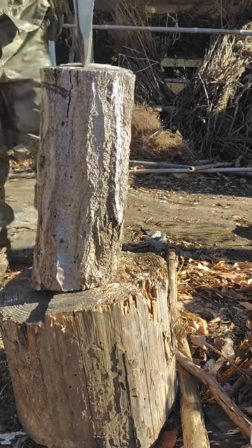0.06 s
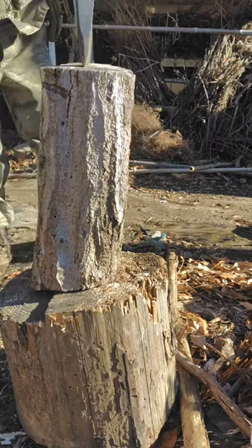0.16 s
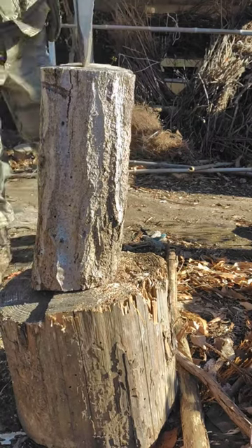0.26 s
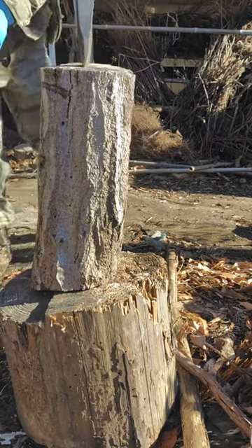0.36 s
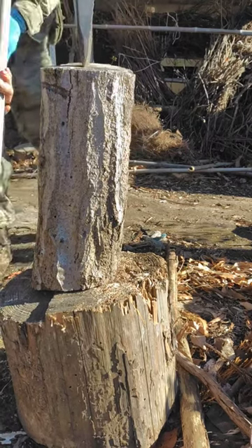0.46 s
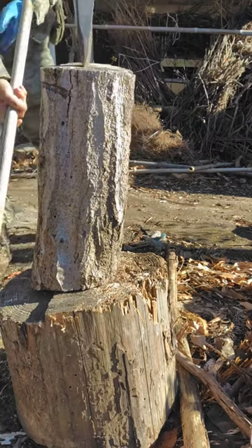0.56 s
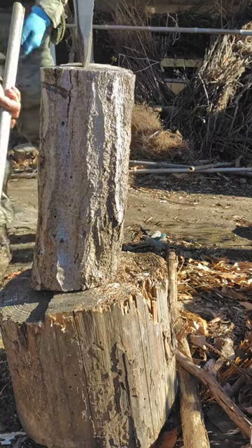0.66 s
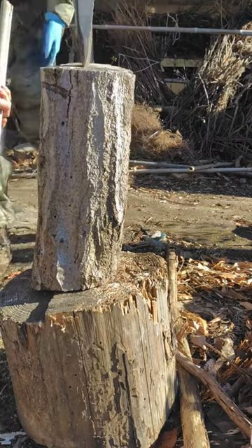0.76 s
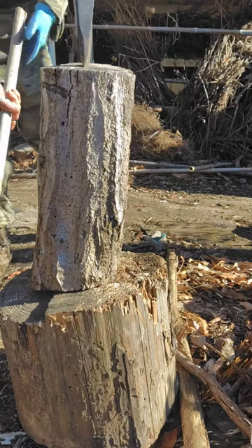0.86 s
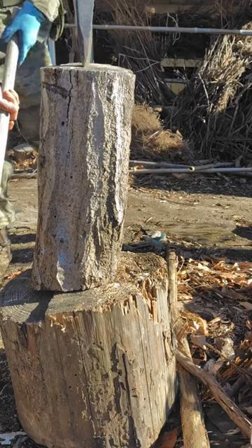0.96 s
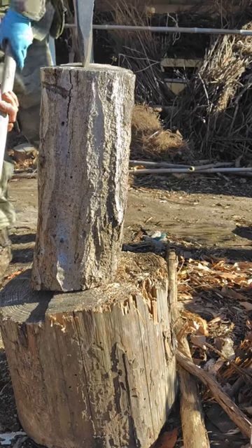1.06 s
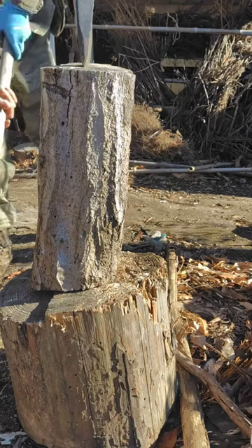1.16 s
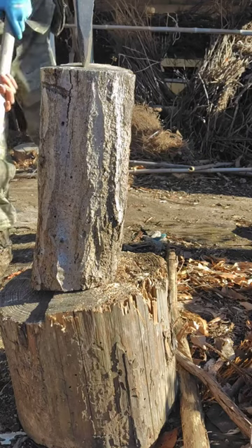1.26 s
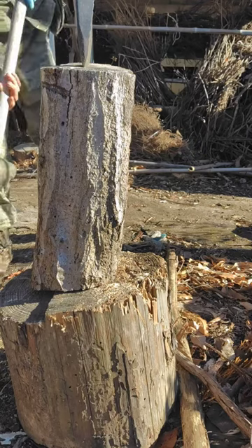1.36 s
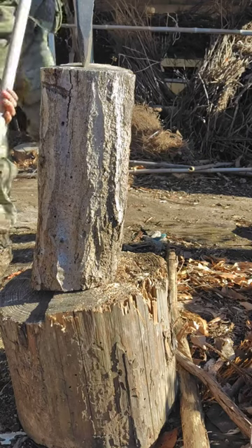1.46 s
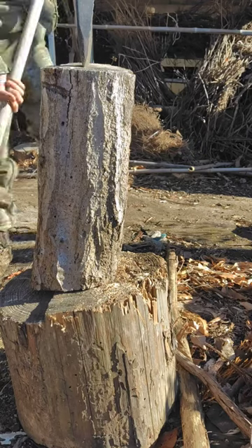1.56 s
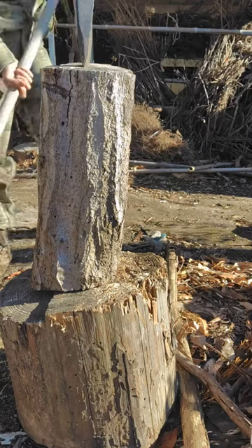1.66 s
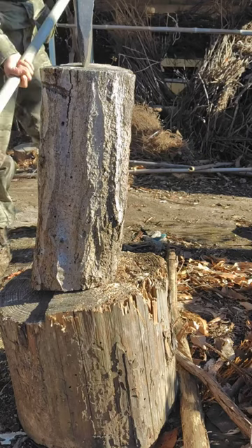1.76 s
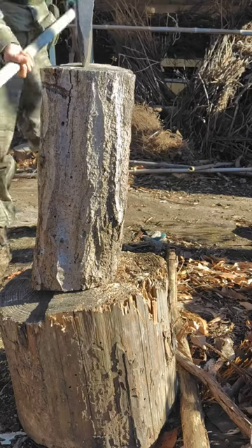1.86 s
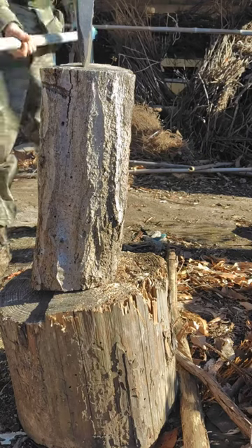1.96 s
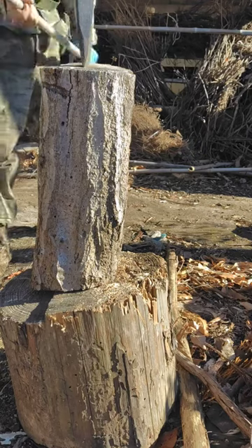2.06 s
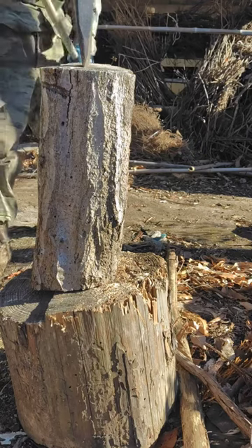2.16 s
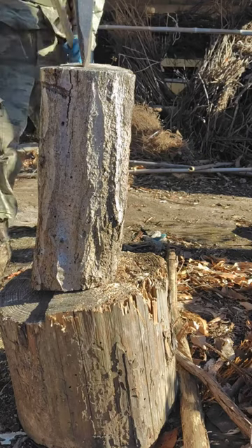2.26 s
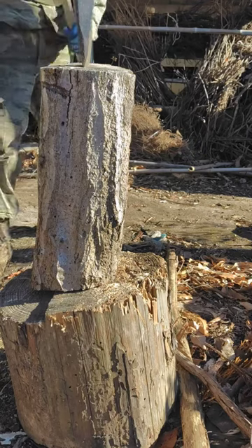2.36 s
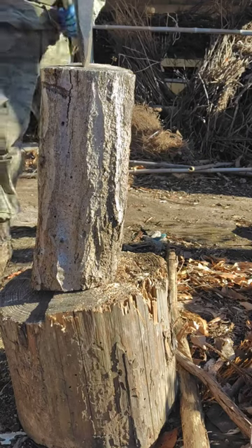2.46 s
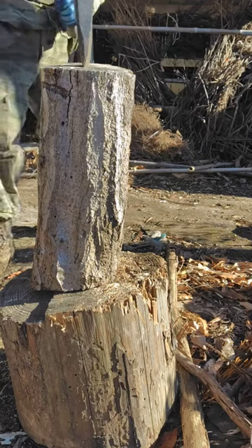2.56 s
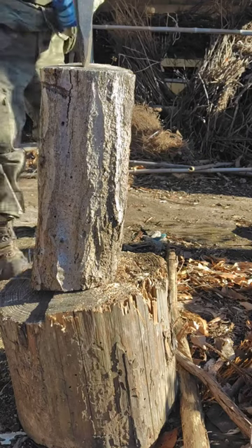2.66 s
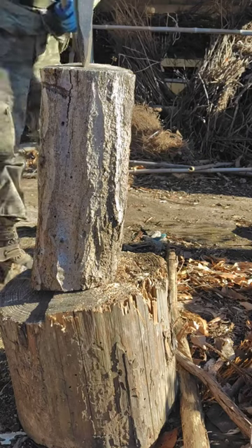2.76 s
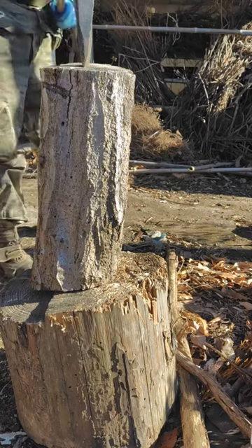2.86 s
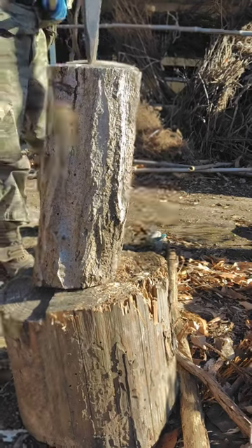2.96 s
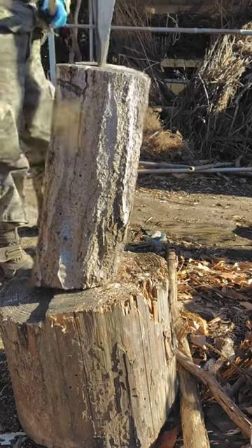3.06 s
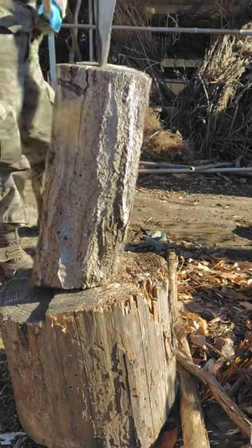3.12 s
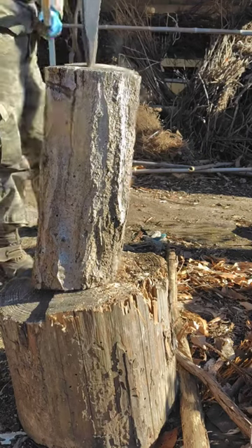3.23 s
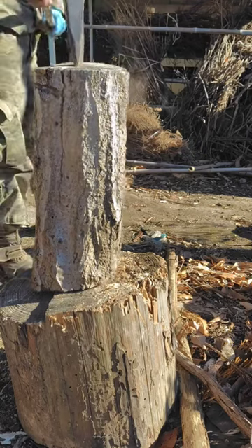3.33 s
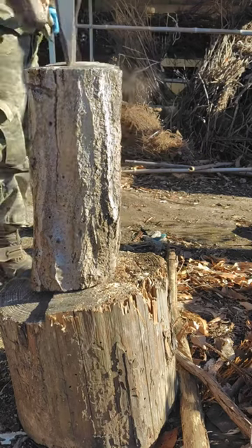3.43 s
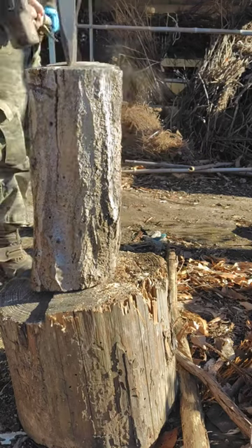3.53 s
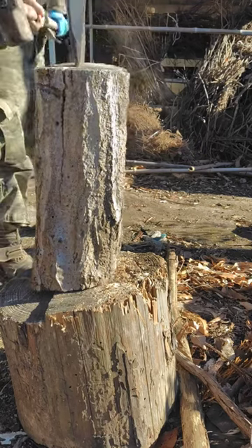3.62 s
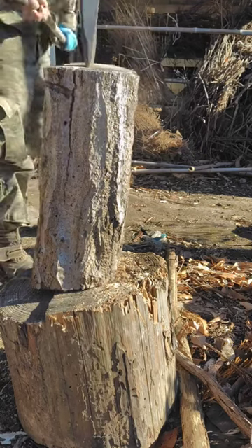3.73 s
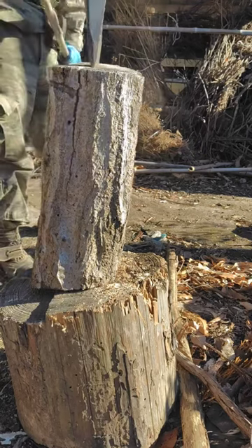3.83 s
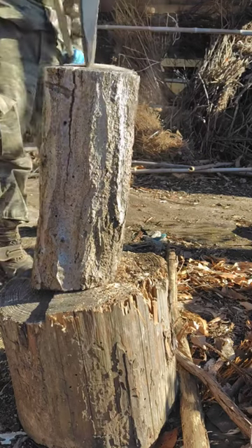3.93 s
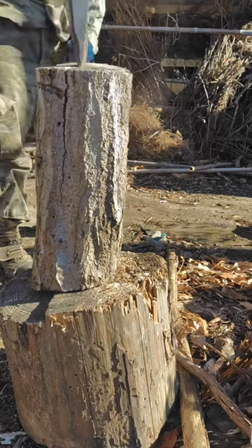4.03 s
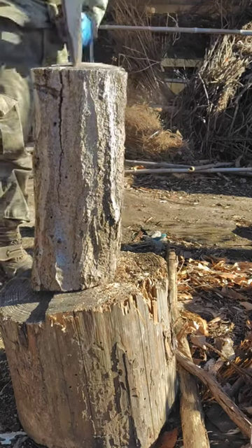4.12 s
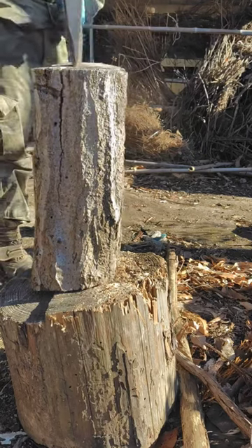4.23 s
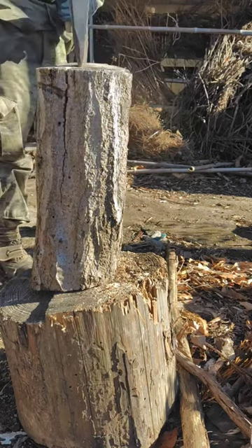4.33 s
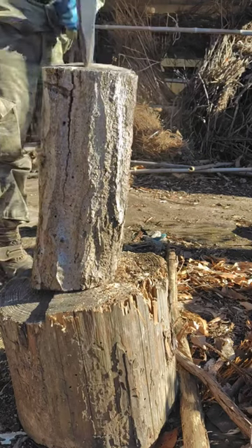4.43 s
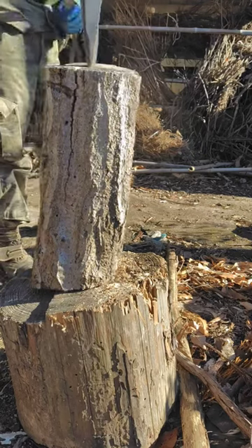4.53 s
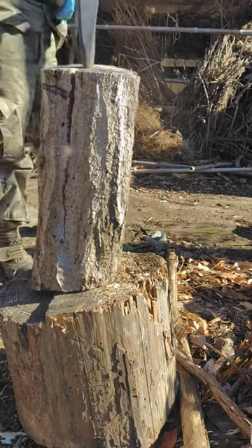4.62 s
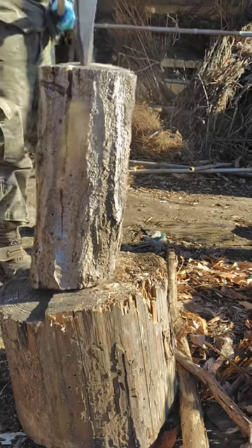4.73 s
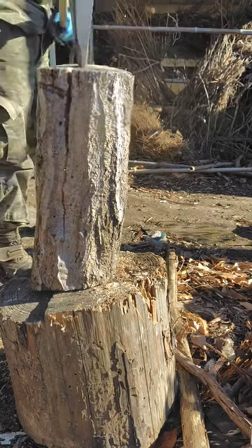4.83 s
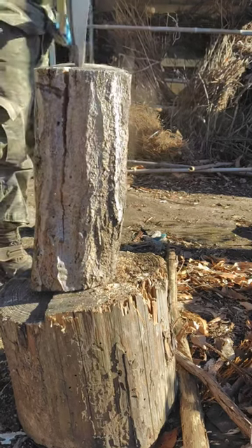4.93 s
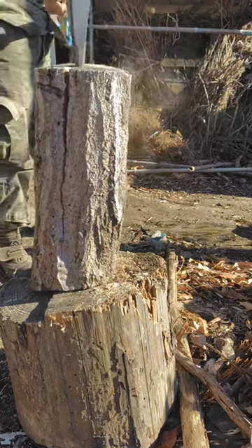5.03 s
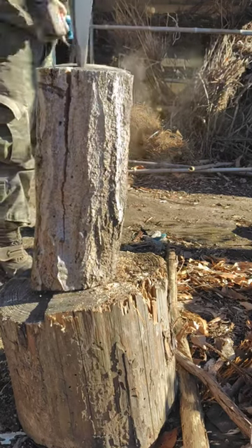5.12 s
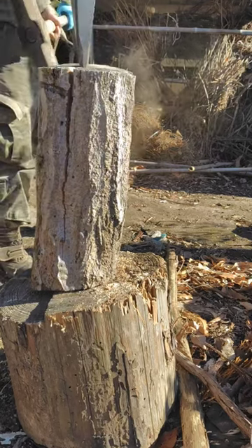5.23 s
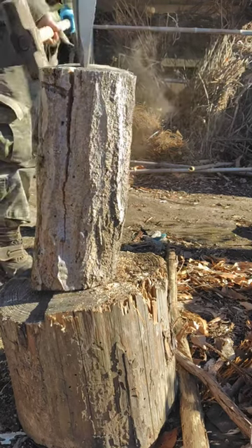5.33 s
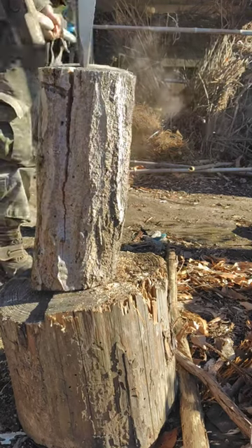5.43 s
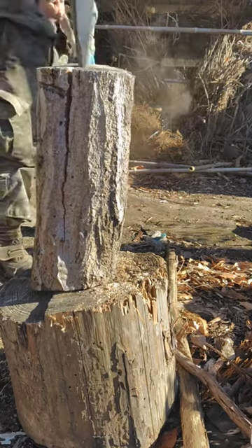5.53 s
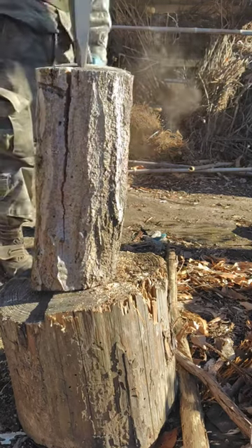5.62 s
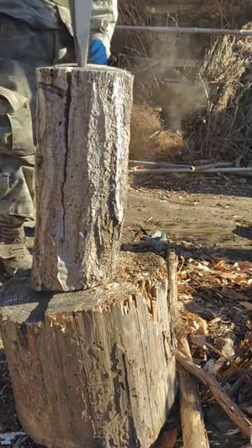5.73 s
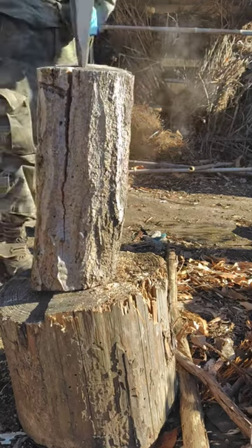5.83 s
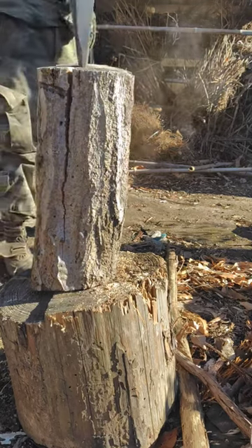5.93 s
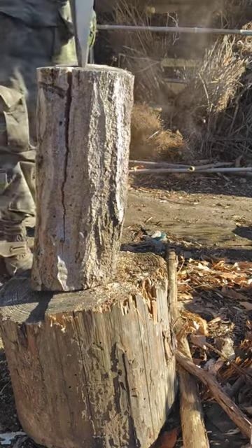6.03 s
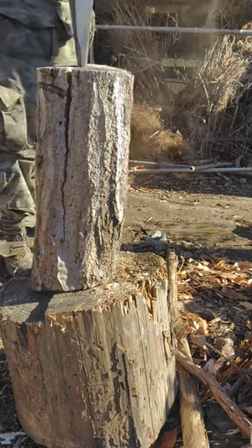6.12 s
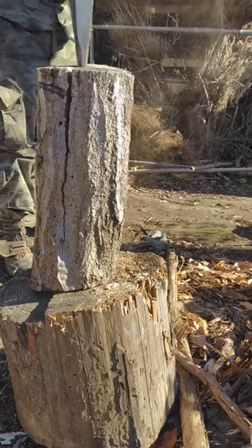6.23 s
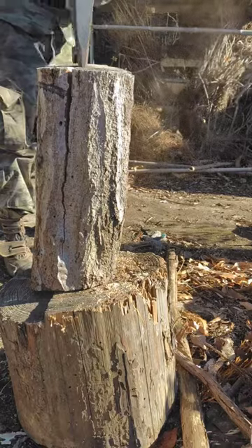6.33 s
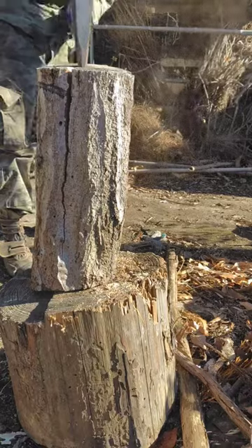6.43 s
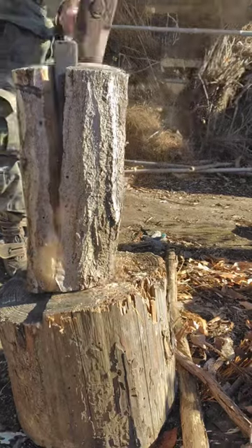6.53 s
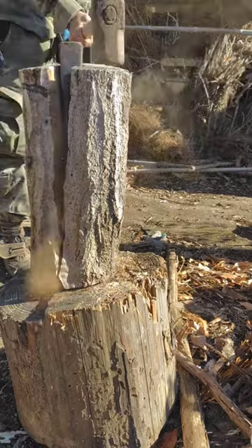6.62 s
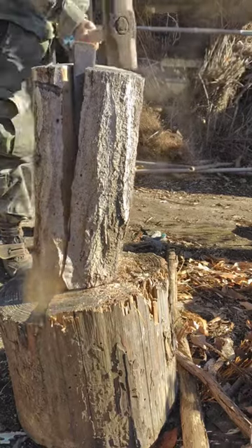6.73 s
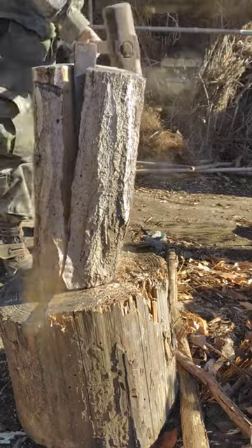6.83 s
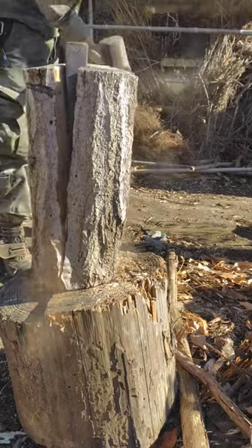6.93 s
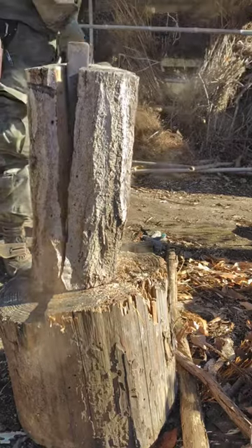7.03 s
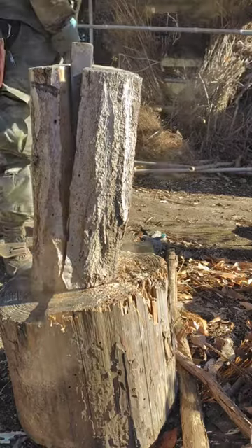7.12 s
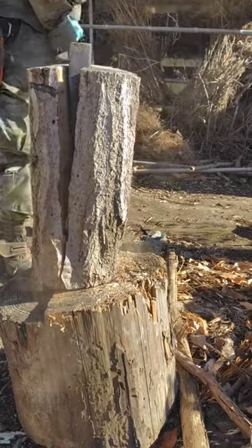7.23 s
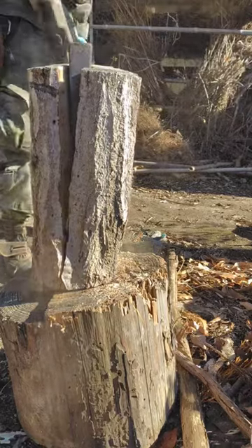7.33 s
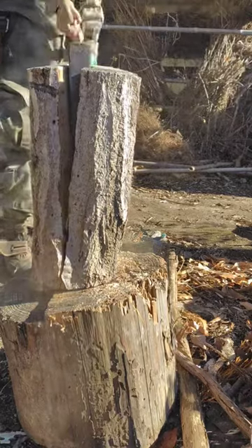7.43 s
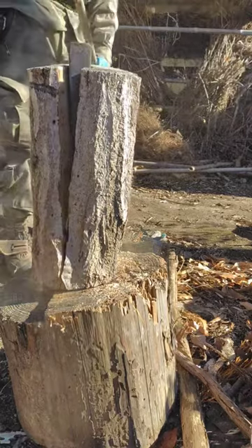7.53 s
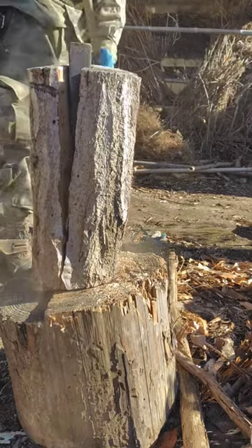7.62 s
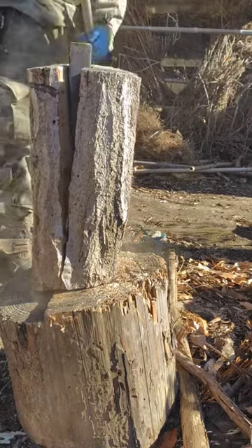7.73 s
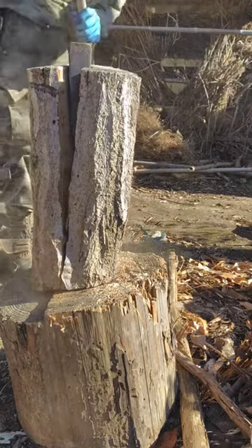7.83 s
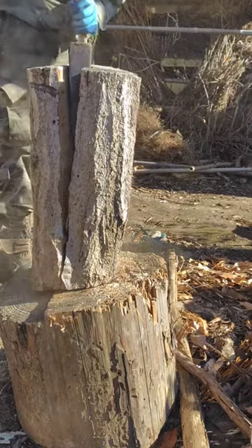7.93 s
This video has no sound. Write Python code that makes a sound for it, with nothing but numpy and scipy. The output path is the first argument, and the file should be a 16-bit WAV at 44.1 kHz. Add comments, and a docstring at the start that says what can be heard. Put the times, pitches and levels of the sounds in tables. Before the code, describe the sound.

Close outdoor pickup in a quiet yard. Work clothes rustle and the handle ticks, with small dull knocks and a soft low bump near the start. Then come three hard hammer blows on a steel wedge in a log, each a sharp woody crack with thin high ringing. The third is strongest: fibres crackle, a heavy dull knock follows, and the steel rings more openly before faint rustling returns.

```python
"""Splitting a log with sledge and wedge

A sledgehammer drives a steel wedge into a log on a chopping block, three blows in a quiet yard.
Each blow layers coloured noise for crack, wood and yard scatter with decaying steel modes; noise bursts
snap the fibres. The third blow splits the log and loosens the wedge. Around the blows, shaped noise rustles
the work clothes, ticks, and puffs on the microphone; damped sines make knocks and bumps over a low rumble
and hiss. The microphone ports colour the mix, and a limiter flattens the peaks.
"""
import sys
import numpy as np
from scipy import signal
from scipy.fft import rfft, irfft, next_fast_len
from scipy.io import wavfile
from scipy.ndimage import uniform_filter1d

SR = 44100
rng = np.random.default_rng(int(sys.argv[2]) if len(sys.argv) > 2 else 0)


def persist_wave(psi):
    """Save psi, clipped to +-1, as 16-bit WAV."""
    counts = np.round(np.clip(psi, -1, 1) * 32767).astype(np.int16)
    wavfile.write(sys.argv[1], SR, np.atleast_2d(counts).T)


N = 351828
T = np.arange(N) / SR
SHORT = T[:int(1.3 * SR)]  # time axis of one event, in seconds
PORT_LAG = 10  # samples by which the right microphone port trails the left

# All levels are those in the mix, ahead of the microphone ports and limiter.
# Low outdoor rumble, steady but for one brief dip. Each row: frequency in Hz, relative level in dB.
RUMBLE_SPECTRUM = [(15, -1), (35, 0.5), (50, 0), (80, 1.5), (120, -14), (170, -22), (400, -48.5),
                   (1500, -80.5)]
RUMBLE_DB = -52
DIP_AT_S, DIP_DEPTH_DB, DIP_WIDTH_S = 4.99, 20, 0.12
# Faint distant hiss. Each row: frequency in Hz, relative level in dB.
HISS_SPECTRUM = [(100, 15), (250, 4.5), (500, 7), (1000, 3), (2000, -4), (3000, -5.5), (4000, -17.5),
                 (5400, -23), (7500, -25), (9500, -37), (13000, -21), (14300, -20), (15000, -49.5)]
HISS_DB = -65

# Rub of the work clothes. Each row: frequency in Hz, relative level in dB.
CLOTH_SPECTRUM = [(100, -9), (420, 11), (800, 2), (1500, 10.5), (2100, -1), (3000, 6), (4000, -3.5),
                  (5400, 3.5), (7500, 5), (9500, -13.5), (12500, 0.5), (14200, -10.5), (15000, -31.5)]
# Arm and leg movements that rub the clothes. Each row: fastest point in seconds, level in dB,
# swell time in seconds.
CLOTH_MOVES = [(.08, -60.5, 0.18), (.40, -47, 0.088), (.67, -54.5, 0.061), (1.10, -58.5, 0.082),
               (1.57, -53, 0.072), (1.75, -59, 0.13), (2.16, -60.5, 0.045), (2.39, -58.5, 0.051),
               (2.82, -58, 0.041), (4.09, -55, .07), (5.79, -57.5, 0.061), (5.97, -59.5, 0.088),
               (6.42, -62.5, 0.053), (7.15, -63, 0.051), (7.37, -62, 0.052), (7.68, -56.5, 0.061)]
STANDING_DB = -70  # faint rustle while the workman stands still
# Every blow moves the clothes twice: the downswing just before it and the recoil after it.
SWING_LEAD_S, SWING_DB, SWING_SWELL_S = 0.0071, -59.5, 0.035
RECOIL_LAG_S, RECOIL_DB, RECOIL_SWELL_S = 0.375, -60.5, 0.05
# Small ticks of handle, grit and chips. Each row: start in seconds, level in dB, T60 in seconds,
# centre in Hz, width between the -6 dB points in Hz.
HANDLING_TICKS = [(.345, -45.5, 0.048, 4040, 8000), (0.394, -38, 0.015, 2960, 8000),
                  (.465, -47.5, 0.25, 1160, 4850), (0.63, -45.5, 0.13, 3550, 8100),
                  (0.994, -43, 0.13, 4130, 8800), (1.172, -55.5, 0.14, 4970, 1200),
                  (1.526, -47, 0.22, 6500, 7950), (2.741, -53, 0.063, 6840, 12000),
                  (2.772, -42, 0.034, 2620, 12800), (2.882, -50.5, 0.035, 1160, 2480),
                  (4.425, -46.5, 0.029, 5400, 1100), (5.2064, -21, 0.0012, 10200, 7040),
                  (5.207, -47, 0.034, 2120, 3500)]

# Dull knocks of the log on the block and of boots on the ground. Each row: start in seconds, level in dB.
DULL_KNOCKS = [(.378, -44.5), (0.396, -43), (0.467, -39), (0.739, -48), (3.0870, -17.5), (5.281, -45),
               (5.69, -52), (6.640, -4), (6.648, -13.5), (6.662, -15.5), (6.793, -51), (6.921, -48),
               (6.987, -43), (7.435, -55.5)]
# Modes of chopping block and ground, detuned at random for each knock. Each row: nominal frequency in Hz,
# level within the knock in dB, T60 in seconds.
BLOCK_MODES = [(183.6, -13, 0.068), (371.5, -5.5, 0.055), (450, 5, 0.024), (566, -5.5, 0.014),
               (948, 5.5, 0.011)]
# Grit in a knock. Each row: frequency in Hz, relative level in dB.
GRIT_SPECTRUM = [(40, -43.5), (150, -14.5), (380, -13), (600, -15), (1000, -12.5), (2000, -20),
                 (6000, -62.5)]

# Puffs of air on the microphone. Each row: start in seconds, level in dB, length in seconds,
# upper -6 dB corner in Hz.
AIR_PUFFS = [(0.462, -32, 0.052, 112), (0.542, -41, 0.15, 58), (0.627, -45.5, 0.16, 56),
             (3.005, -24.5, 0.14, 59.9), (3.171, -40, 0.22, 46.4), (4.724, -32.5, 0.044, 131)]
# A soft bump against the microphone and its rebound. Each row: start in seconds, level in dB.
MIC_BUMPS = [(.465, -18), (0.487, -18)]
# Low modes of the microphone's mount. Each row: frequency in Hz, level within the bump in dB, T60 in seconds.
MOUNT_MODES = [(34.5, 0.5, 0.14), (77.3, 2.5, 0.082), (114, -12, 0.059), (228, -16, 0.017)]

# Hammer blows. Each row: start in seconds, crack level in dB, wood level in dB, wood T60 in seconds,
# yard level in dB, head axial level in dB, head bending level in dB, bending tilt in dB per octave,
# wedge level in dB, grip of the log from 0 to 1.
HAMMER_BLOWS = [(3.0075, -10, -9, 0.2, -31, -8.5, -23.5, -3.5, -16, 0.99),
                (4.7274, -6.5, -10.5, 0.24, -32, -0.5, -22.5, 9, -12, 0.97),
                (6.5698, 3, -0.5, 0.26, -31, -14.5, -19, 1, 2, 0.25)]
# Hard contact and breaking fibres. Each row: frequency in Hz, relative level in dB.
CRACK_SPECTRUM = [(60, -20.5), (300, -8.5), (700, 1.5), (1500, 1), (2200, 3.5), (3000, -3), (4000, -11),
                  (7600, -1), (9500, -15.5), (13800, -2), (15000, -17.5)]
# Broad colour of the wood. Each row: frequency in Hz, relative level in dB.
WOOD_SPECTRUM = [(50, -6), (170, 0), (350, -1.5), (800, 0), (1400, 1), (2300, -4), (3000, -3), (3800, -7.5),
                 (5400, -5), (6900, -12), (7700, -12), (8700, -34), (13500, -8), (14800, -46.5)]
# Resonances of the log, all raised together against the wood colour. Each row: frequency in Hz,
# width between the -6 dB points in Hz, level in dB before that common lift.
LOG_RESONANCES = [(575, 71, -1.5), (860, 110, -1), (1520, 120, -7), (2220, 24, -8.5), (2340, 15, -12.5),
                  (2940, 160, -6), (3280, 9, -11), (3770, 33, -19), (4102, 39, -6.5), (4870, 21, -17.5),
                  (5560, 81, -6), (5573, 220, -2)]
# Scatter from the yard. Each row: frequency in Hz, relative level in dB.
YARD_SPECTRUM = [(60, -8), (200, -3), (500, 1.5), (1200, 4.5), (2200, -3), (3000, -3), (4000, -10.5),
                 (5400, -7), (7700, -10.5), (9000, -47), (13500, -38), (15000, -51)]
# Near reflections from ground, block and workman. Each row: delay in seconds, linear gain.
NEAR_REFLECTIONS = [(.0031, 0.19), (.0058, 0.16), (.0093, .3)]
# Modes of the hammer head. Each row: frequency in Hz, level in dB before the blow's own levels,
# T60 in seconds, left minus right in dB, bending share from 0 to 1.
HEAD_MODES = [(8050, -8.5, 1, -6.5, 1), (11410, -18.5, 0.27, 1.5, 0), (11838, -3, 0.62, 15, 0.12),
              (13925, -9, 0.71, 15.5, 1)]
# Modes of the free wedge. Each row: frequency in Hz, level in dB before the blow's own level,
# T60 in seconds, left minus right in dB, level change at full grip in dB, shift at full grip in Hz,
# chatter from 0 to 1.
WEDGE_MODES = [(2976, -0.5, 0.11, 4.5, -24, 7, 1), (4435, -3.5, 0.31, -8, -27, 2, 0.9),
               (6512, 3.5, 0.29, 3.5, -7.5, 4.5, 0.3), (7400, -15.5, 0.27, 1, 17.5, 161, 1),
               (7462, -1.5, 0.49, 2, -10, 189, 0.1), (7870, -12, 0.32, -9.5, -6, 84, 0.98),
               (9600, -19.5, .6, 3, -42, -2.5, 1)]
# Fibres snapping as the split opens. Each row: start in seconds, level in dB, T60 in seconds,
# treble -6 dB corner in Hz.
FIBRE_SNAPS = [(3.0108, -3, 0.031, 4853), (3.0134, 4, 0.0067, 1111), (3.0259, -7, 0.075, 1824),
               (4.7321, -2, 0.013, 907), (4.738, -15, 0.035, 894), (6.5736, -2, 0.011, 4020),
               (6.578, 0, 0.005, 5050), (6.5886, -0.5, 0.012, 4450), (6.601, -4.5, 0.02, 5000),
               (6.607, 0.5, 0.023, 3030), (6.614, -5, 0.083, 6000), (6.626, -6.5, 0.083, 6016)]


def undb(db):
    """Decibels to linear gain."""
    return 10 ** (np.asarray(db) / 20)


def unit(x):
    """Scale to rms 1."""
    return x / np.sqrt(np.mean(np.abs(x) ** 2))


def fade(t60):
    """Exponential decay that loses 60 dB in t60 seconds."""
    return np.exp(-np.log(1000) * SHORT / t60)


def build_up(time_s):
    """Soft onset that closes on full level with the given time constant."""
    return 1 - np.exp(-SHORT / time_s)


def add(out, s, x):
    """Mix a stereo sound in at time s."""
    i = int(s * SR)
    out[:, i:i + x.shape[1]] += x[:, :N - i]


def colour(points):
    """Gain against frequency, drawn through (Hz, dB) points on a log frequency axis."""
    hz, db = np.transpose(points)
    return lambda f: undb(np.interp(np.log(f), np.log(hz), db))


def noise(gain, wide_hz, size=len(SHORT)):
    """Coloured stereo noise of rms 1: left port leads, and the ports grow unlike towards and above wide_hz."""
    n = next_fast_len(size)
    f = np.maximum(np.arange(n // 2 + 1) * SR / n, 1)
    mid, side = rfft(rng.standard_normal((2, n)))
    side = side * f / (f + wide_hz)
    spectra = np.array([mid + side, mid - side]) * gain(f)
    left, right = irfft(spectra, n)[:, :size]
    return unit(np.array([left, np.roll(right, PORT_LAG)]))


def walk(rate, size=N):
    """Smooth random drift with spread near 1, taking about rate steps a second."""
    k = int(SR / rate)
    steps = np.repeat(rng.standard_normal(size // k + 2), k)
    smooth = uniform_filter1d(uniform_filter1d(steps, k), k)
    return unit(smooth)[:size]


def thud(hz, t60):
    """A damped mode: one decaying sine that reaches the left port first."""
    swing = np.sin(2 * np.pi * hz * SHORT) * fade(t60)
    return np.array([swing, np.roll(swing, PORT_LAG)])


def rumble():
    """Low outdoor noise whose level dips once, briefly."""
    dip_db = DIP_DEPTH_DB * np.exp(-((T - DIP_AT_S) / DIP_WIDTH_S) ** 2)
    return noise(colour(RUMBLE_SPECTRUM), 160, size=N) * undb(RUMBLE_DB - dip_db)


def hiss():
    """Faint distant noise with a slight, slow drift in level."""
    return noise(colour(HISS_SPECTRUM), 760, size=N) * undb(HISS_DB + 0.38 * walk(3))


def swell(s, db, swell_s):
    """Loudness of one movement: it gathers speed, peaks at time s and slows down again."""
    return undb(db) / np.cosh(np.clip((T - s) / swell_s, -20, 20))


def clothes():
    """Cloth rubs as limbs move: crinkly noise follows the combined power of all the movements."""
    moves = list(CLOTH_MOVES)
    for s, *_ in HAMMER_BLOWS:
        moves.append((s - SWING_LEAD_S, SWING_DB, SWING_SWELL_S))
        moves.append((s + RECOIL_LAG_S, RECOIL_DB, RECOIL_SWELL_S))
    rubbing = np.sqrt(undb(STANDING_DB) ** 2 + sum(swell(*move) ** 2 for move in moves))
    crinkle = unit(undb(1.7 * walk(400) + walk(40)))
    return noise(colour(CLOTH_SPECTRUM), 2000, size=N) * crinkle * rubbing


def ticks():
    """Handle, grit and chips tick: decaying noise in a band around each centre."""
    out = np.zeros((2, N))
    for s, db, t60, hz, width in HANDLING_TICKS:
        tick = noise(lambda f: 1 / (1 + ((f - hz) * 2 / width) ** 2), 1300)
        add(out, s, tick * fade(t60) * undb(db))
    return out


def knocks(grit_db=-9, grit_t60=0.02, echo_db=-25, echo_t60=0.27):
    """Dead knocks: short modes of block and ground, with grit that dies quickly and a weaker, longer tail."""
    out = np.zeros((2, N))
    for s, db in DULL_KNOCKS:
        body = 0
        for hz, mode_db, t60 in BLOCK_MODES:
            detune = 1 + 0.25 * rng.standard_normal()
            body = body + thud(hz * detune, t60) * undb(mode_db)
        grit_fade = undb(grit_db) * fade(grit_t60) + undb(echo_db) * fade(echo_t60)
        grit = noise(colour(GRIT_SPECTRUM), 1500) * grit_fade
        add(out, s, (body + grit) * build_up(0.00076) * undb(db))
    return out


def puffs():
    """Air pushes on the microphone: low noise that starts fast and drops away at the end of its length."""
    out = np.zeros((2, N))
    for s, db, length, top_hz in AIR_PUFFS:
        gust = build_up(0.003) / (1 + (SHORT / length) ** 12)
        air = noise(lambda f: f / (f + 20) / (1 + (f / top_hz) ** 3), 120)
        add(out, s, air * gust * undb(db))
    return out


def bumps():
    """A soft push sets the low modes of the microphone's mount swinging."""
    out = np.zeros((2, N))
    modes = sum(thud(hz, t60) * undb(db) for hz, db, t60 in MOUNT_MODES)
    bump = -modes * build_up(0.0024)  # the first swing is negative
    for s, db in MIC_BUMPS:
        add(out, s, bump * undb(db))
    return out


def reflections(f):
    """Near reflections comb the spectra of crack, wood, fibres and yard scatter."""
    echoes = sum(gain * np.exp(-2j * np.pi * f * delay) for delay, gain in NEAR_REFLECTIONS)
    return np.abs(1 + echoes)


def crack_colour(f):
    """Spectrum of a hard contact or a breaking fibre, combed by the near reflections."""
    return colour(CRACK_SPECTRUM)(f) * reflections(f)


def log_body(f, resonance_db=7):
    """Broad colour of the wood with the log's resonances added in power."""
    peaks = 0
    for hz, width, db in LOG_RESONANCES:
        peaks = peaks + undb(db) ** 2 / (1 + ((f - hz) * 2 / width) ** 2) ** 2
    return np.sqrt(colour(WOOD_SPECTRUM)(f) ** 2 + undb(resonance_db) ** 2 * peaks)


def crack(db, t60=0.07):
    """Hammer meets wedge: a short burst of hard contact noise."""
    return noise(crack_colour, 6000) * fade(t60) * undb(db)


def crunch(db, t60, grain_db=1.0, splinter_db=-7):
    """Stressed wood: log noise and fine splinters, made grainy by fast random level changes."""
    grain = unit(undb(grain_db * walk(1300, size=len(SHORT))))
    body = noise(lambda f: log_body(f) * reflections(f), 910) * fade(t60)
    # fine splinters are bright and die twice as fast as the body of the log
    splinters = noise(crack_colour, 1800) * fade(t60 / 2) * undb(splinter_db)
    return (body + splinters) * grain * undb(db)


def yard_scatter(db, t60=0.82, build_s=0.033):
    """Fence and bushes scatter the blow: noise builds up, flutters in level and decays."""
    flutter = undb(0.96 * walk(60, size=len(SHORT)))
    scatter = noise(lambda f: colour(YARD_SPECTRUM)(f) * reflections(f), 300)
    return scatter * flutter * build_up(build_s) * fade(t60) * undb(db)


def drift(rate):
    """Random complex swell for each port, as long as one ring."""
    size = len(SHORT)
    return np.array([walk(rate, size) + 1j * walk(rate, size) for _ in range(2)])


def ring(hz, db, t60, pan_db, chatter):
    """One steel mode: it starts to waver as echoes of the moving tool come in; chatter widens its line."""
    waver = 0.52 * drift(34) * build_up(0.09)
    modulation = 1 + waver + chatter * drift(200)
    tone = np.imag(modulation * np.exp(2j * np.pi * hz * SHORT))
    port_gain = undb(db + np.array([[pan_db], [-pan_db]]) / 2)
    return tone * fade(t60) * port_gain * build_up(0.0063)


def hammer_head(axial_db, bending_db, tilt_db, chatter=0.1):
    """The point of contact sets how strongly axial and bending modes speak; a solid head rings almost purely."""
    out = 0
    for hz, db, t60, pan_db, bend in HEAD_MODES:
        off_centre_db = bending_db + tilt_db * np.log2(hz / 11000)
        mode_db = db + (1 - bend) * axial_db + bend * off_centre_db
        out = out + ring(hz, mode_db, t60, pan_db, chatter)
    return out


def wedge(wedge_db, grip):
    """The log's grip mutes most wedge modes and stiffens most of them, raising their pitch."""
    out = 0
    for hz, db, t60, pan_db, grip_db, grip_hz, chatter in WEDGE_MODES:
        out = out + ring(hz + grip * grip_hz, db + wedge_db + grip * grip_db, t60, pan_db, chatter)
    return out


def blows():
    """Each blow joins contact crack, crunching wood, yard scatter and the ringing of hammer and wedge."""
    out = np.zeros((2, N))
    for (s, crack_db, wood_db, wood_t60, yard_db,
         axial_db, bending_db, tilt_db, wedge_db, grip) in HAMMER_BLOWS:
        struck = crack(crack_db) + crunch(wood_db, wood_t60) + yard_scatter(yard_db)
        steel = hammer_head(axial_db, bending_db, tilt_db) + wedge(wedge_db, grip)
        add(out, s, struck + steel)
    return out


def snapping_fibres():
    """Fibres let go one by one: decaying crack noise, each with its own treble limit."""
    out = np.zeros((2, N))
    for s, db, t60, top_hz in FIBRE_SNAPS:
        snap = noise(lambda f: crack_colour(f) / (1 + (f / top_hz) ** 2), 4000)
        add(out, s, snap * fade(t60) * undb(db))
    return out


def scene():
    """The whole yard at the microphone."""
    outdoors = rumble() + hiss()
    handling = clothes() + ticks()
    microphone = puffs() + bumps()
    return outdoors + handling + knocks() + microphone + blows() + snapping_fibres()


def limiter(x, top_db=-12, release_db_per_s=85, attack_s=0.0013):
    """Gain drops just after a loud sound begins and climbs back at a steady rate."""
    keep = np.exp(-1 / (attack_s * SR))
    power = signal.lfilter([1 - keep], [1, -keep], np.mean(x ** 2, axis=0))
    over_db = np.maximum(10 * np.log10(np.maximum(power, 1e-12)) - top_db, 0)
    # a running maximum on a rising ramp gives a straight-line release in dB
    ramp_db = release_db_per_s * T
    held_db = np.maximum.accumulate(over_db + ramp_db) - ramp_db
    return x * undb(-held_db)


def record(dry, notch_hz=6050, notch_q=7, port_hz=3020, port_q=9, port_db=-5, top_hz=14400):
    """The microphone ports add a resonance and cut a notch; limiter and clipping follow; the top is cut."""
    resonance = signal.lfilter(*signal.iirpeak(port_hz, port_q, fs=SR), dry)
    ported = dry + undb(port_db) * resonance
    ported = signal.lfilter(*signal.iirnotch(notch_hz, notch_q, fs=SR), ported)
    limited = np.clip(limiter(ported), -0.8, 0.8)
    # steep low-pass: order 8, 0.2 dB ripple, 70 dB stopband
    low_pass = signal.ellip(8, 0.2, 70, top_hz, fs=SR, output="sos")
    return signal.sosfilt(low_pass, limited)


dry = scene()
out = record(dry)
persist_wave(out)
```